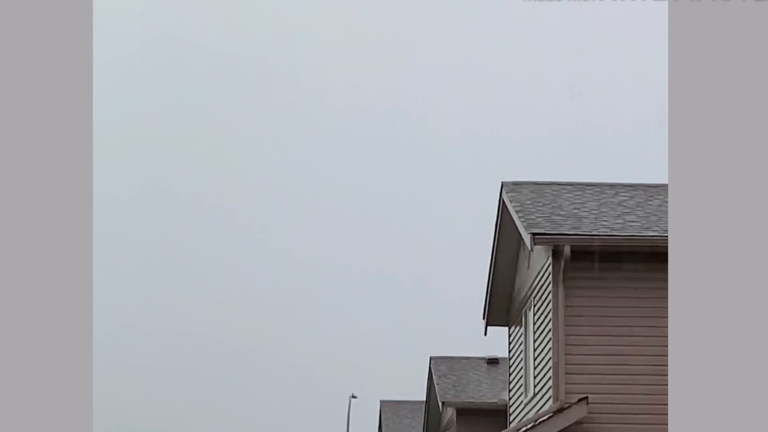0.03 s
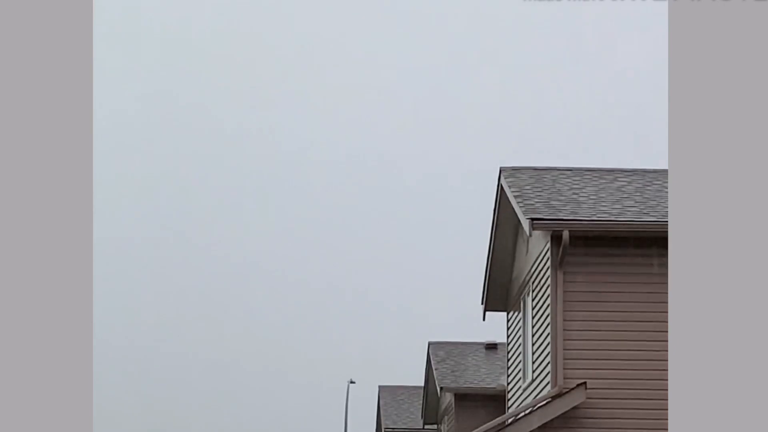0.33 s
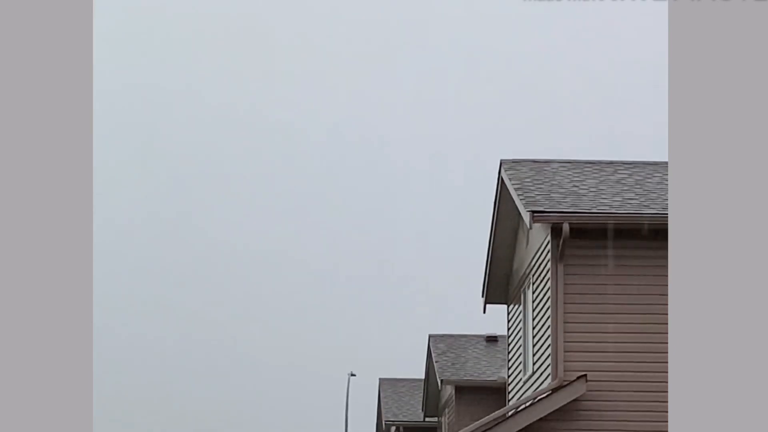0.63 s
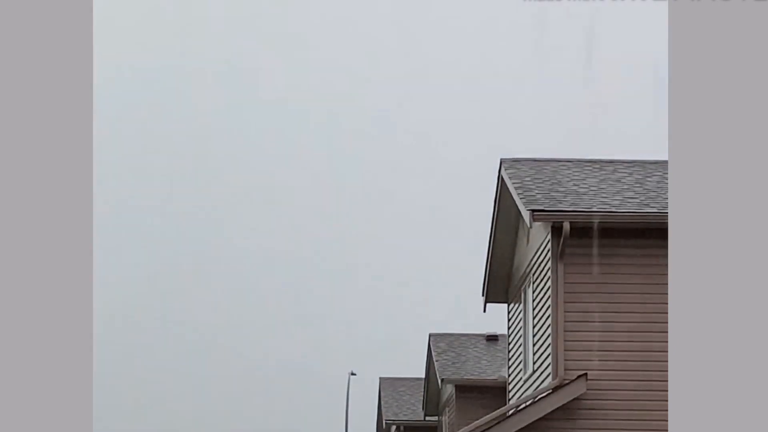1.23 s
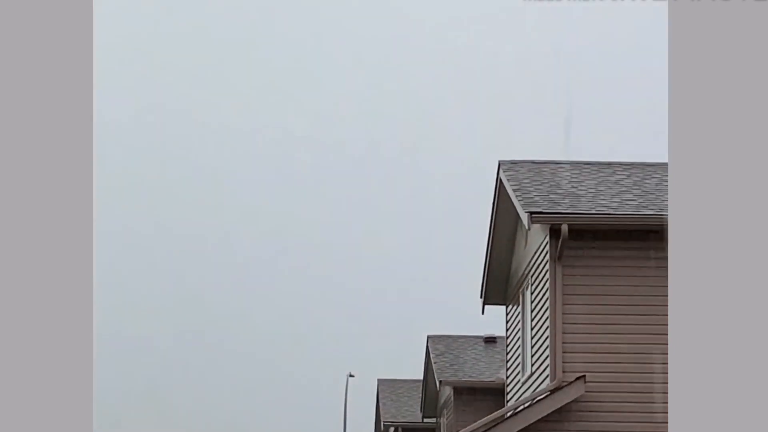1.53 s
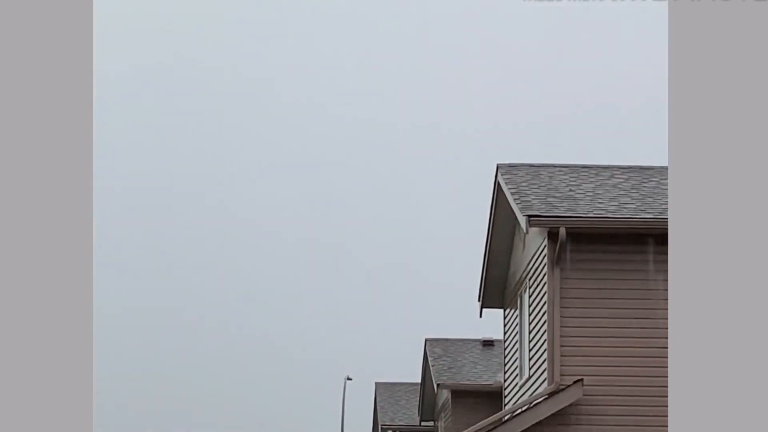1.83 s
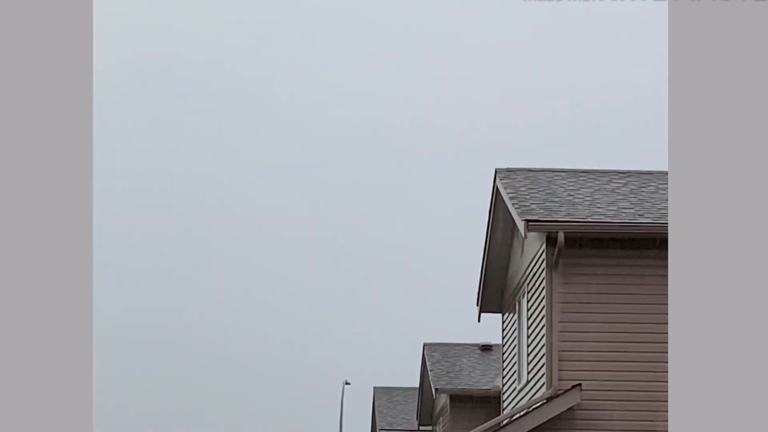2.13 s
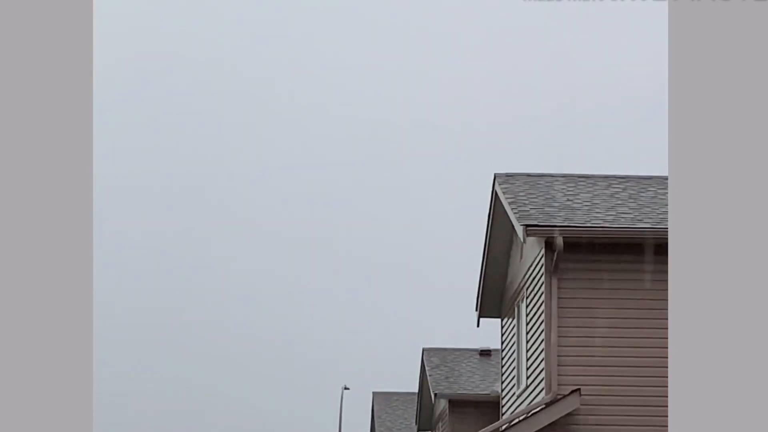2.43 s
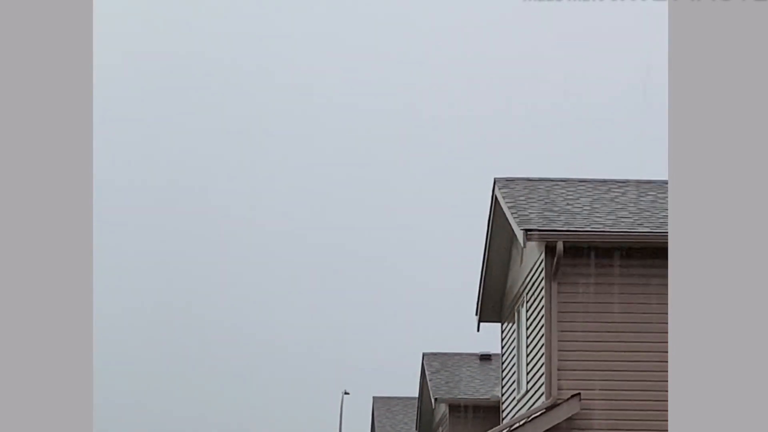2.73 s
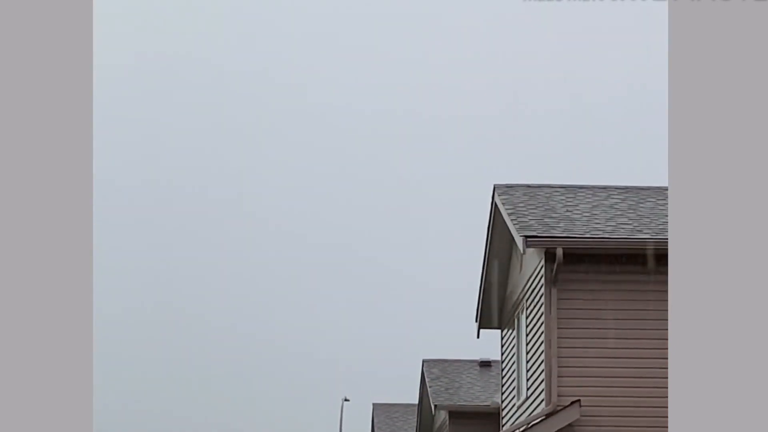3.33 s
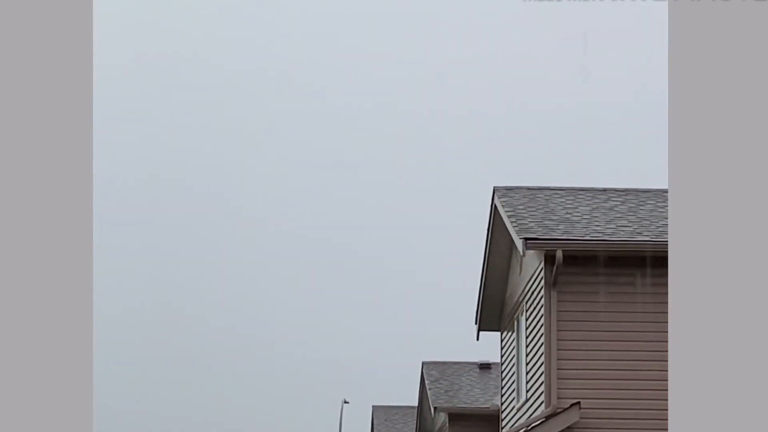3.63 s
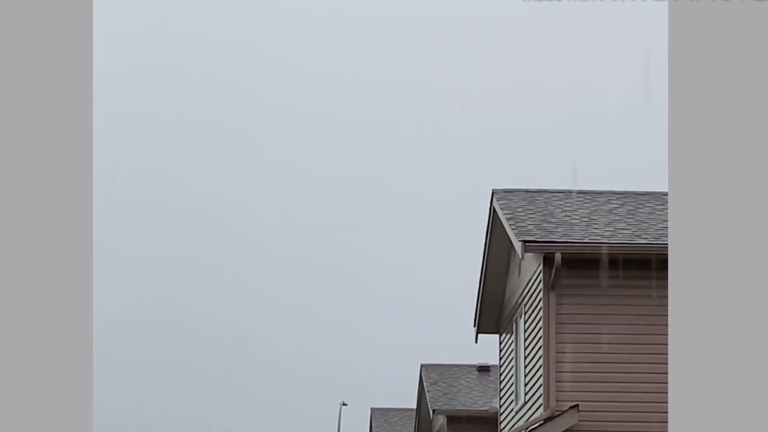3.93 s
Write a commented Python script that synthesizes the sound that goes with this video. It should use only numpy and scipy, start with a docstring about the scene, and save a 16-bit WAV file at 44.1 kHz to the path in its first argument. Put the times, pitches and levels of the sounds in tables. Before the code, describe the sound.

Hail cracks and patters on hard ground and roofs, over hissing rain and a low rumble.

```python
"""Hail falls among houses, heard from beside a wall. Near stones crack on hard ground and echo off
the wall and the yard; others patter, tap on roofs and clank on a metal gutter. Dull knocks come from
far stones and from the low body of some near cracks. Rain hisses all round, and the storm rumbles low
behind it, with wind. Two microphones hear nearly the same sound, out of step."""
import sys
import numpy as np
from scipy import signal
from scipy.fft import rfft, irfft, next_fast_len
from scipy.io import wavfile
from scipy.ndimage import uniform_filter1d, map_coordinates

SR = 44100
rng = np.random.default_rng(int(sys.argv[2]) if len(sys.argv) > 2 else 0)


def output_pcm(signal):
    """Save a mono or channel-first signal as 16-bit PCM at the path in sys.argv[1].

    Samples are clipped to [-1, 1] before scaling.
    """
    pcm = np.clip(np.atleast_2d(signal).T, -1, 1) * 32767
    wavfile.write(sys.argv[1], SR, np.round(pcm).astype(np.int16))


N = 176400  # 4 seconds


def amp(db):
    """Turn decibels into a gain."""
    return 10 ** (np.asarray(db) / 20)


def unit(x):
    """Scale to an average power of 1."""
    return x / np.sqrt(np.mean(x ** 2) + 1e-20)


def packet(x):
    """Scale to a total energy of 1."""
    return x / np.sqrt(np.sum(x ** 2, axis=-1, keepdims=True) + 1e-20)


def along(points, hz):
    """Read between (frequency, value) rows on a log scale."""
    freqs, values = np.transpose(points)
    return np.interp(np.log(hz + 1), np.log(freqs + 1), values)


def curve(rows):
    """Join (time, value) rows into one value per sample."""
    return np.interp(np.arange(N) / SR, *np.transpose(rows))


def wobble(rate):
    """A smooth curve through `rate` random points a second."""
    return map_coordinates(rng.standard_normal(int(N * rate / SR) + 4), [np.arange(N) * rate / SR])


def filtered(x, response):
    """Multiply each frequency in x by response(hz)."""
    n = x.shape[-1]
    padded = next_fast_len(n + n // 4)
    return irfft(rfft(x, padded) * response(np.fft.rfftfreq(padded, 1 / SR)), padded)[..., :n]


def add(track, s, sound):
    """Mix a sound into a track, s seconds in."""
    start = max(round(s * SR), 0)
    part = track[..., start:start + sound.shape[-1]]
    part += sound[..., :part.shape[-1]]


def ring(hz, t60, size):
    """A tone of energy 1 that fades by 60 dB in t60 seconds."""
    t = np.arange(size) / SR
    return packet(np.sin(2 * np.pi * hz * t) * amp(-60 * t / t60))


def rush(spectrum, alike, patchy_db):
    """Rushing stereo noise with randomly louder and softer patches."""
    def mid_and_side(hz):
        angle = np.arccos(np.clip(along(alike, hz), -1, 1)) / 2
        return amp(along(spectrum, hz)) * [np.cos(angle), np.sin(angle)]
    cells = signal.stft(rng.standard_normal((2, N)), nperseg=512)[2]
    patches = uniform_filter1d(rng.standard_normal(cells.shape[1:]), size=7, axis=0)
    patches = unit(uniform_filter1d(patches, size=9, axis=1))
    noise = signal.istft(cells * amp(patchy_db * patches), nperseg=512)[1][:, :N]
    mid, side = filtered(noise, mid_and_side)
    return unit(np.array([mid + side, mid - side]))


# The rain's tone (frequency [Hz], relative level [dB])
RAIN_TONE = [(500, 3), (1300, 2.5), (2500, 1), (3900, 3), (5600, 0), (7500, 0), (9000, 1.5), (11500, -0.5),
             (13000, -2.5), (15500, -6)]
# How alike its hiss is left and right (frequency [Hz], likeness [1 = same])
RAIN_ALIKE = [(1500, 0.9), (2900, 0.033), (4500, 1), (15000, 1)]
def rain(drops_per_s=980):
    """Many tiny splashes over the hiss of far rain; both flutter a little."""
    when, chance, flip = rng.random((int(drops_per_s * N / SR), 3)).T
    sizes = amp(-2.5 * np.log(np.maximum(chance, .005))) * np.sign(flip - .5)  # few drops are loud
    drops = np.bincount((when * N).astype(int), sizes, N)
    splashes = unit(filtered(drops, lambda hz: amp(along(RAIN_TONE, hz))))
    hiss = rush(RAIN_TONE, RAIN_ALIKE, patchy_db=2.0)
    flutter = amp(1.54 * wobble(rate=17))
    return flutter * (amp(-47.5) * splashes + amp(-42.5) * hiss)


# The tone of each storm layer, lowest first (frequency [Hz], relative level [dB])
RUMBLE_TONE = [(20, -40), (32, -41), (45, -13), (65, -1), (85, -1.5), (108, -4.5), (130, -11.5),
               (250, -51.5)]
BOOM_TONE = [(80, -26), (110, -3.5), (134, 4), (152, -2), (185, -1), (215, -3), (270, -19), (500, -66)]
ROAR_TONE = [(120, -12), (190, -2.5), (240, 1.5), (330, 0), (430, -2), (560, -10), (850, -21.5),
             (2000, -63)]
WIND_TONE = [(300, -20), (520, 0.5), (820, -0.5), (1300, -7.5), (2000, -15), (4000, -53)]
# How each swells and fades (time [s], relative level [dB])
RUMBLE_LEVEL = [(0.1, -40), (0.25, -39), (0.55, -34), (0.7, -38.5), (0.85, -41), (1.05, -34), (1.2, -36),
                (1.42, -34.5), (1.65, -37), (1.85, -39), (2.05, -39.5), (2.26, -35.5), (2.5, -35),
                (2.75, -35.5), (3.08, -42.5), (3.25, -35.5), (3.65, -44.5), (4, -37)]
BOOM_LEVEL = [(0.1, -39), (0.22, -36), (0.33, -38), (0.45, -35.5), (0.8, -37.5), (1.1, -35.5), (1.3, -36),
              (1.45, -31), (1.6, -34), (1.8, -33), (2.2, -33.5), (2.45, -35.5), (2.9, -38.5), (3.3, -33.5),
              (3.42, -36.5), (3.52, -34.5), (3.68, -38), (4, -34.5)]
ROAR_LEVEL = [(0.05, -41), (.22, -31.5), (.32, -36), (.43, -29.5), (.62, -34.5), (.8, -36), (.97, -30),
              (1.12, -29.5), (1.25, -34.5), (1.46, -31), (1.72, -33), (2.1, -37), (2.5, -34), (3.05, -35.5),
              (3.28, -32.5), (3.45, -37), (3.7, -39.5), (3.88, -32.5), (4, -31)]
WIND_LEVEL = [(0.0, -45), (0.36, -39.5), (0.93, -40), (0.99, -37), (2.0, -42), (2.8, -39), (2.96, -42.5),
              (3.26, -41.5), (3.7, -45), (4.0, -40.5)]
# How alike the storm is left and right (frequency [Hz], likeness [1 = same])
STORM_ALIKE = [(150, 1), (350, 0.96), (550, 0.75), (800, 0.49), (1300, 0.7), (2500, 1)]
def storm():
    """A deep rumble, a boom, a hollow roar and wind among the houses each rise and fall."""
    rumble = amp(curve(RUMBLE_LEVEL) + 1) * rush(RUMBLE_TONE, STORM_ALIKE, patchy_db=0)
    boom = amp(curve(BOOM_LEVEL) + 0.1) * rush(BOOM_TONE, STORM_ALIKE, patchy_db=0.5)
    roar = amp(curve(ROAR_LEVEL)) * rush(ROAR_TONE, STORM_ALIKE, patchy_db=1)
    wind = amp(curve(WIND_LEVEL) + 0.5) * rush(WIND_TONE, STORM_ALIKE, patchy_db=1.5)
    return rumble + boom + roar + wind


def click(hz, crumble_s=0.0031, ring_cycles=9.8):
    """Ice on hard ground snaps, crumbles and rings briefly at the stone's pitch."""
    n = np.arange(300)
    crumbs = packet(rng.standard_normal(len(n)) * np.minimum(n / 10, 1) * amp(-60 * n / SR / crumble_s))
    snap = n == 0
    strike = np.pad(snap + amp(-2) * crumbs, (2, 0))
    sharpness = ring_cycles * np.pi / np.log(1000)
    ringing = signal.lfilter(*signal.iirpeak(min(hz, SR / 3), sharpness, fs=SR), strike)
    crack = packet(ringing) + amp(4.5) * packet(strike)
    # A stone gives off little sound far from its pitch.
    band = [min(0.49 * hz, SR / 5), np.clip(2.4 * hz, SR / 4.5, SR / 2.3)]
    return packet(signal.lfilter(*signal.butter(2, band, "band", fs=SR), crack))


WALL_S, WALL_DB = 0.0067, -10.5  # delay and level of the wall's echo
# How long the yard echoes (frequency [Hz], time to fade by 60 dB [s])
YARD_FADE = [(500, 0.32), (3000, 0.16), (7000, 0.12), (15000, 0.12)]
def yard(sound, width=0.042):
    """The yard's stereo echo of one hit; the high notes die first."""
    hz, t, cells = signal.stft(rng.standard_normal((2, SR // 6)), SR, nperseg=128)
    fade = amp(-60 * t / along(YARD_FADE, hz)[:, None])
    mid, side = signal.istft(cells * fade, SR, nperseg=128)[1]
    build_up = 1 - np.exp(-np.arange(len(mid)) / SR / WALL_S)
    tail = packet(np.array([mid + width * side, mid - width * side]) * build_up)
    return signal.fftconvolve(tail, sound[None], axes=1)


def patter(stones_per_s=130, middle_hz=7200, octaves=1.3):
    """Small stones land at random in the yard, each with its echoes."""
    out = np.zeros((2, N))
    for when, chance, pitch in rng.random((int(stones_per_s * N / SR), 3)):
        s = when * N / SR
        hz = middle_hz * 2 ** (octaves * (pitch - .5))
        hit = amp(-26.5 - 3 * np.log(max(chance, .04))) * click(hz)
        add(out, s, hit)
        add(out, s + WALL_S, amp(WALL_DB) * hit)
        add(out, s, amp(0.5) * yard(hit))
    return out


def roofs(taps_per_s=140, middle_hz=3200, octaves=1.8, ring_cycles=120):
    """Far stones tap on roofs, each at its own pitch, blurred by the yard."""
    out = np.zeros((2, N))
    for when, chance, pitch in rng.random((int(taps_per_s * N / SR), 3)):
        hz = middle_hz * 2 ** (octaves * (pitch - .5))
        hit = amp(-30.5 - 2.47 * np.log(max(chance, .05))) * ring(hz, ring_cycles / hz, size=900)
        add(out, when * N / SR, yard(hit, width=0.5))
    return out


def from_any_side(sound, max_lag_s=0.00003):
    """Sound from a random direction reaches one microphone a little earlier."""
    lag = max_lag_s * (2 * rng.random() - 1) * np.array([[.5], [-.5]])
    return filtered(sound, lambda hz: np.exp(2j * np.pi * hz * lag))


# Near hailstones (time [s], relative level [dB], pitch [Hz], yard echo compared with the click [dB])
NEAR_STONES = [(0.0803, -19.5, 6550, 6.5), (0.2927, -23, 7000, -5), (0.3053, -14, 6900, -2),
               (0.406, -13.5, 7540, 1), (0.4629, -10, 6300, -6), (0.5497, -25, 6540, -5),
               (0.588, -10, 10900, -6), (0.6016, -7, 6600, 2), (0.6897, -19, 10000, -6),
               (0.7312, -15, 9500, -9), (0.8495, -13, 7040, -1), (0.8616, -9, 6900, -5),
               (1.029, -11, 9900, -4), (1.083, -16, 10500, -8), (1.1223, -13, 6500, 3),
               (1.1827, -9, 10000, -3), (1.2696, -5.5, 11000, -13), (1.3249, -20, 11500, -10),
               (1.4212, -16.5, 6500, 0), (1.517, -28, 10700, -7), (1.6755, -1.5, 8700, -5),
               (1.7585, -13.5, 10600, -11), (1.772, -15, 6860, -11), (1.806, -10, 10900, -4),
               (2.069, -15.5, 10500, 1), (2.131, -14, 6300, 0), (2.2353, -16, 6700, 5.5),
               (2.2761, 1, 6700, -4.5), (2.546, -15.5, 6700, 9), (2.5563, -13.5, 8100, 6),
               (2.6045, -16, 10800, 3), (2.6292, -13, 6360, 5), (2.6688, -10, 7500, 0.5),
               (2.833, -18, 11400, 6), (2.9325, -23, 10500, 6), (2.9709, -12, 7600, 3),
               (3.049, -16.5, 10500, 4), (3.0805, -15, 10000, -11), (3.088, -2.5, 5500, -5),
               (3.3096, -13, 6800, 0), (3.438, -17, 11000, 6), (3.6083, -12.5, 11000, -1),
               (3.63, -6.5, 6430, -3), (3.6651, -10, 5830, -5), (3.69, -9, 6370, -9),
               (3.7195, -13, 5950, 0), (3.774, -6.5, 10700, -3), (3.793, -12.5, 7600, -1),
               (3.9083, -11.5, 10000, 3.5), (3.9154, -7.5, 8400, -3), (3.9803, -8, 8260, -5)]
def hailstones(boost_db=2.2):
    """Each near stone clicks, echoes off the wall and fades in the yard."""
    out = np.zeros((2, N))
    for s, db, hz, echo_db in NEAR_STONES:
        hit = amp(db + boost_db) * click(hz)
        add(out, s, from_any_side(hit))
        add(out, s + WALL_S, amp(db + boost_db + WALL_DB) * from_any_side(click(hz)))
        add(out, s, amp(echo_db) * yard(hit))
    return out


# Dull knocks (time [s], relative level [dB], pitch [Hz])
DULL_KNOCKS = [(1.121, -5, 2680), (1.223, -7, 3300), (2.2764, -4, 3970), (2.669, -3.5, 3200),
               (2.862, -7.5, 3100), (3.087, -1, 3500), (3.273, -7, 3420), (3.665, -15, 3420),
               (3.792, -6, 3420), (3.980, -3.5, 3400)]
def knocks(ring_cycles=9.7):
    """Dull, echoing knocks: some from far stones, others the low body of near stones' cracks."""
    out = np.zeros((2, N))
    for s, db, hz in DULL_KNOCKS:
        hit = amp(db) * ring(hz, ring_cycles / hz, size=400)
        add(out, s, amp(-11) * hit)
        add(out, s, amp(-7) * yard(hit, width=1.0))
    return out


# Hits on the gutter (time [s], level [dB])
GUTTER_HITS = [(2.6993, -5), (2.706, -4)]
# The notes it rings with (pitch [Hz], relative level [dB], time to fade by 60 dB [s])
GUTTER_NOTES = [(1510, 1.5, 0.095), (2010, -1, 0.16), (2370, 8, 0.12), (2600, -4, 0.052),
                (2900, -11, 0.034)]
# The tone of its clank (frequency [Hz], relative level [dB])
CLANK_TONE = [(700, -12), (1500, -16), (2400, -9.5), (3200, -7.5), (4200, -15), (9000, -20)]
def gutter(clank_s=0.17, size=6000):
    """A stone clanks on a metal gutter, which rings briefly."""
    out = np.zeros((2, N))
    for s, db in GUTTER_HITS:
        notes = sum(amp(level + rng.normal(0, 1.3)) * ring(hz, t60, size)
                    for hz, level, t60 in GUTTER_NOTES)
        noise = filtered(rng.standard_normal(size), lambda hz: amp(along(CLANK_TONE, hz)))
        clank = packet(noise * amp(-60 * np.arange(size) / SR / clank_s))
        add(out, s, amp(db) * packet(packet(notes) + amp(7) * clank))
    return out


def scene():
    """Hail, rain and storm together."""
    return hailstones() + patter() + knocks() + roofs() + gutter() + rain() + storm()


# How far the right microphone lags the left (frequency [Hz], lag [radians])
MIC_LAG = [(0, 0), (200, -.15), (500, -.6), (850, -.25), (1200, -.45), (1500, -.05), (2000, .1),
           (3000, .65), (4550, 3.14), (6800, 6.28), (9000, 9.42), (11100, 12.57), (13200, 15.7),
           (15200, 18.85)]
# How much louder the left one is (frequency [Hz], level [dB])
MIC_BALANCE = [(50, 0.2), (130, 1), (280, 1.7), (550, -0.9), (1200, -1), (4000, 0)]
def record(dry, top_hz=15850):
    """Two microphones hear out of step, at slightly unequal levels, and lose the highest treble."""
    def microphones(hz):
        lag = np.interp(hz, *np.transpose(MIC_LAG))
        half = np.array([[.5], [-.5]])  # left and right move opposite ways
        balance = amp(half * along(MIC_BALANCE, hz))
        return np.exp(1j * half * lag) * balance / np.sqrt(1 + (hz / top_hz) ** 200)
    return filtered(dry, microphones)


dry = scene()
out = record(dry)
output_pcm(out)
```